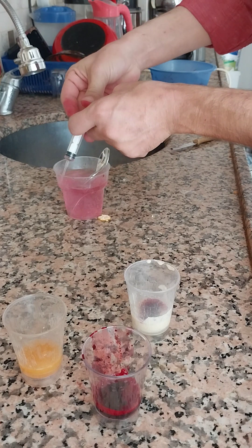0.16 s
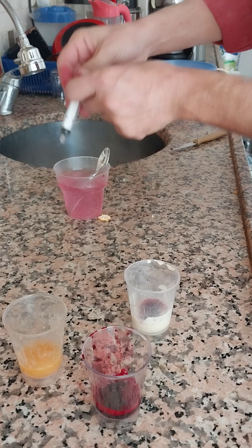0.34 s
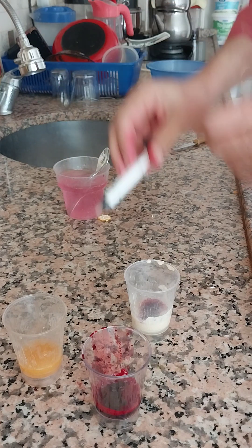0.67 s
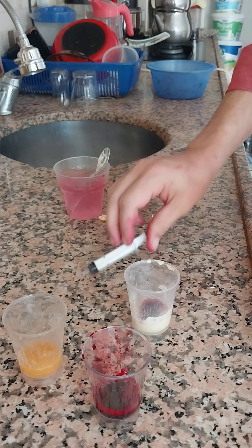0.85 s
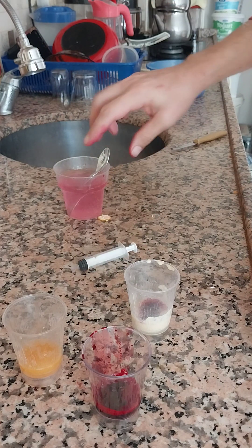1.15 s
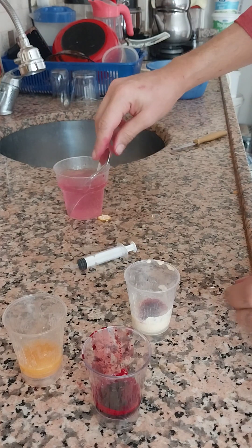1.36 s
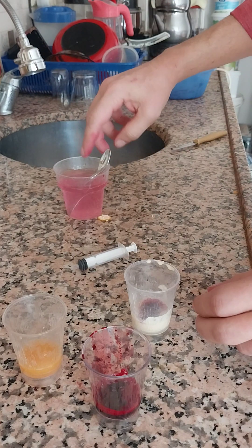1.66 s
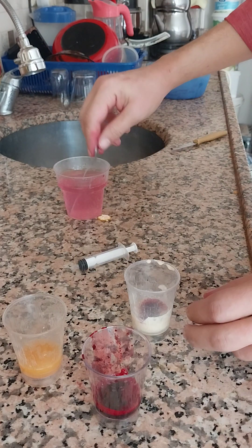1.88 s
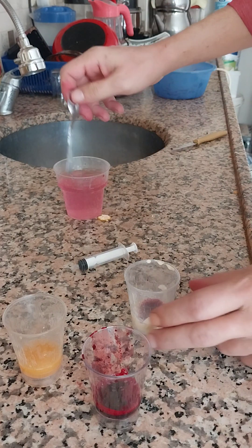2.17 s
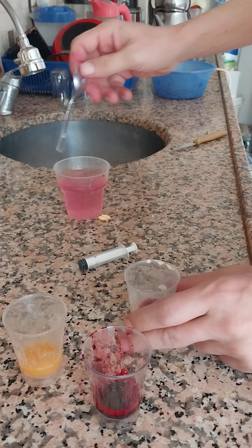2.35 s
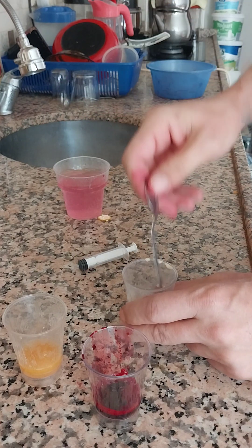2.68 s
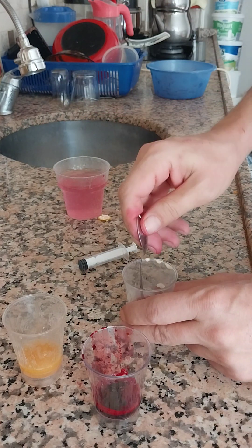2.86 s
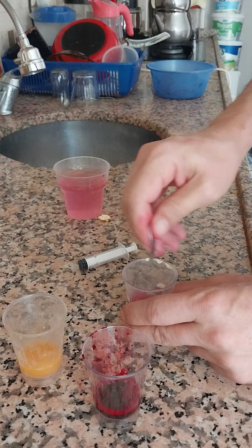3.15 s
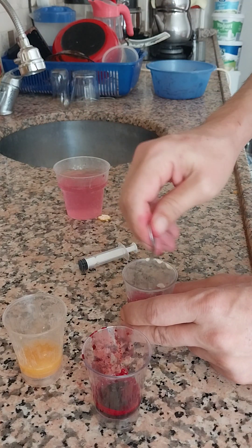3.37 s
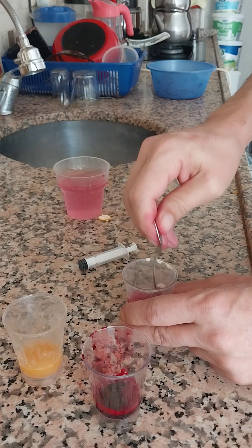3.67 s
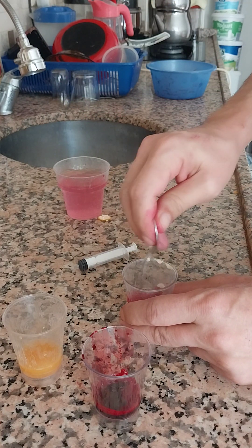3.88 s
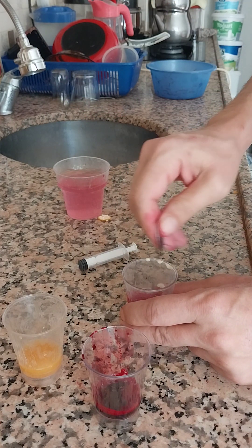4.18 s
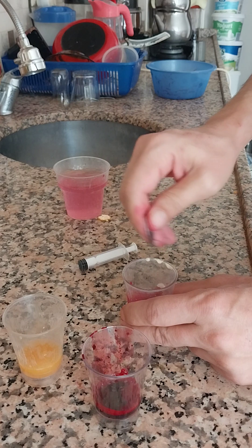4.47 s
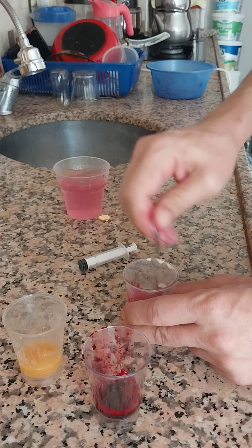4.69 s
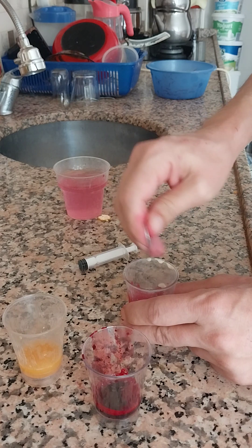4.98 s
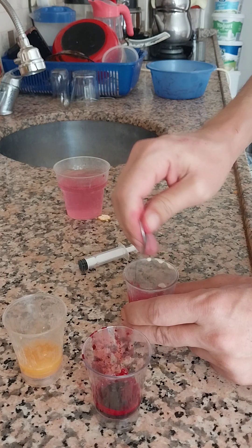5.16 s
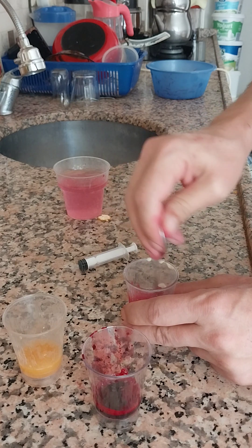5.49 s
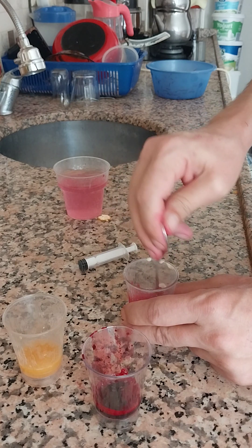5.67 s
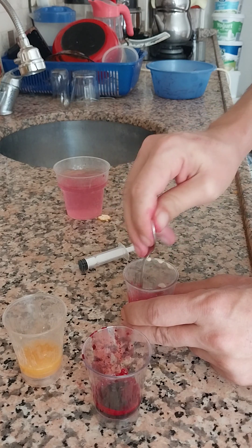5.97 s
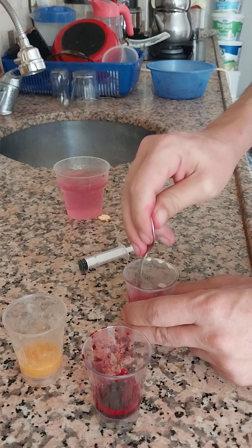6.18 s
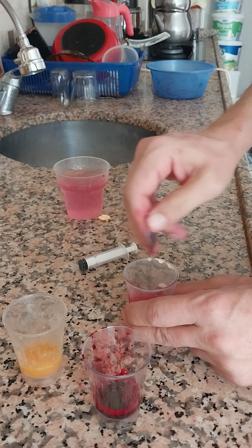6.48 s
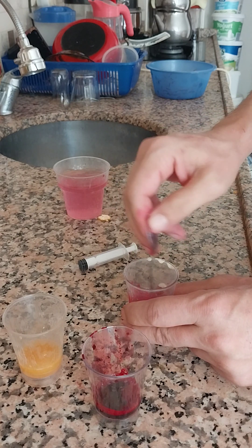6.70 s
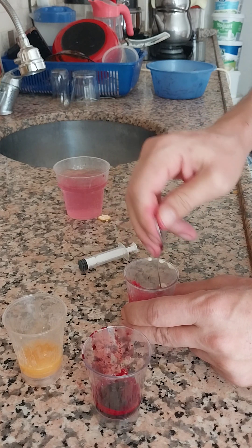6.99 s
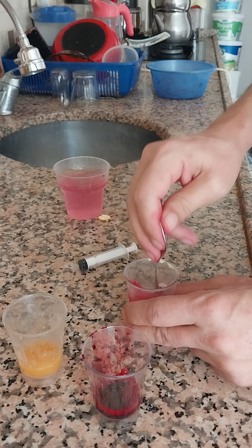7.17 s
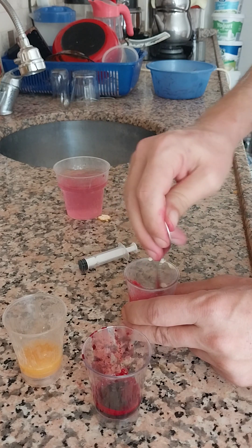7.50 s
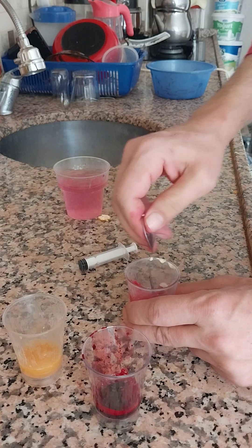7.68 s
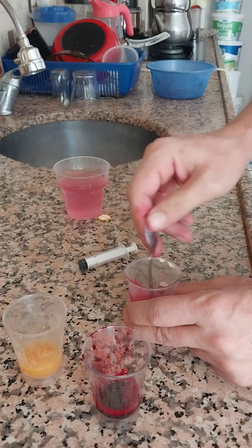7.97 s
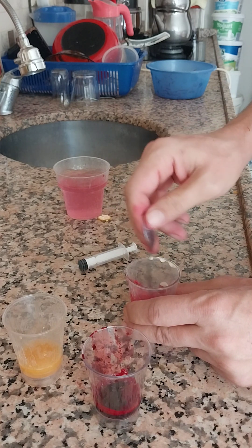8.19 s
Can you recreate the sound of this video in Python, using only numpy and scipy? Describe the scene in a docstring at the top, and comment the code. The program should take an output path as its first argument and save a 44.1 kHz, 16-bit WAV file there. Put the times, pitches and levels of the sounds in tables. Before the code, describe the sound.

A syringe squirts into a cup of water and clatters onto stone, then a metal teaspoon clicks and scrapes stirring paste in a thin plastic cup.

```python
"""A kitchen counter, heard by a phone with two microphone ports, a fridge humming over faint room noise.
A syringe squirts into a cup of water: spattering noise, rising bubble chirps and a squeak of narrow noise.
A sleeve rustles, the syringe drops on the stone (struck modes), and fingers tick on a spoon.
Then a steel teaspoon stirs thick paste in a thin plastic cup: stick-slip clicks drive its drifting modes,
blows ring cup, counter and spoon, and the edge skids along the wall as a chatter of rising rate."""
import sys
import numpy as np
from scipy import signal
from scipy.fft import rfft, irfft, next_fast_len
from scipy.io import wavfile
from scipy.ndimage import uniform_filter1d

SR = 44100
rng = np.random.default_rng(int(sys.argv[2]) if len(sys.argv) > 2 else 0)


def generate_wav(sig):
    """Save sig (samples, or channels by samples) to the path in sys.argv[1] as 16-bit PCM at SR."""
    pcm = np.round(np.clip(np.atleast_2d(sig).T, -1, 1) * 32767).astype(np.int16)
    wavfile.write(sys.argv[1], SR, pcm)


N = 367686

# Event levels are set ahead of the room and the ports. Tone tables weight a sound by frequency.

# Syringe jet. Each row: time in seconds, gain in dB.
JET = [(0.0, -42.5), (0.062, -54), (0.206, -54), (0.25, -50.5), (0.262, -40), (0.28, -73), (0.36, -73)]
# Tone of the jet in the water. Each row: frequency in Hz, level in dB per Hz.
JET_TONE = [(210, -37), (350, -25), (420, -23), (575, -39), (707, -24), (1260, -16.5), (1570, -12.5),
            (3340, -20.5), (6030, -17.5), (8710, -25.5), (11300, -18), (16000, -28.5)]
# Plunger squeaking in the barrel. Each row: time in seconds, pitch in Hz, fundamental in dB, octave in dB.
SQUEAK = [(.14, 735, -80, -70), (.16, 741, -70, -55), (.2, 799, -70, -56), (.215, 860, -58, -45),
          (.232, 779, -72, -46.5), (.25, 841, -62, -53), (.262, 770, -71, -38.5), (.275, 773, -76, -60),
          (.3, 767, -84, -73), (.33, 790, -92, -80)]
# Bubbles driven under by the jet grow as it digs deeper; one strand each for small, middling and large.
# Each row: time in seconds, pitch in Hz, level in dB.
GURGLE = [
    [(0, 2580, -43.5), (.04, 2540, -60), (.085, 2180, -51.5), (.14, 1960, -49), (.19, 1900, -62),
     (.22, 1816, -75)],
    [(0, 1500, -38), (.04, 1460, -62), (.09, 1440, -61), (.13, 1330, -55), (.16, 1400, -81)],
    [(0, 757, -45), (.03, 653, -62.5), (.07, 580, -61), (.11, 533, -64), (.14, 500, -76)],
]
# Sleeve as the arm swings, then reaches. Each row: time in seconds, gain in dB.
SLEEVE = [
    [(0.36, -78.5), (0.56, -65.5), (0.658, -76), (0.744, -79.5), (0.834, -105), (0.896, -102), (0.9, -100)],
    [(1.1, -86), (1.172, -90), (1.184, -91), (1.198, -87), (1.356, -84), (1.444, -80.5), (1.624, -95),
     (1.7, -100)],
]
# Tone of the cloth. Each row: frequency in Hz, level in dB per Hz.
SLEEVE_TONE = [(590, -42), (1000, -16), (1440, -9), (1530, -1), (2530, -18), (2810, -13), (3490, -14.5),
               (4600, -10.5), (5100, -12), (5780, -10), (6410, -21.5), (7700, -16.5), (8540, -31),
               (10000, -15), (15500, -25.5)]
# Syringe landing and bouncing on the stone.
# Each row: start in seconds, then peak levels of barrel, crack and thump in dB.
DROP = [(0.918, -28.5, -38.5, -90), (0.93, -34, -53, -33), (0.9542, -28.5, -18, -53.5),
        (0.989, -37.5, -34, -42.5)]
# Modes of the syringe barrel. Each row: frequency in Hz, level in dB, t60 in seconds.
BARREL = [(440, -4, .05), (560, -3, .04), (700, -5, .04), (860, -7, .04), (1050, -8, .03), (1300, -6, .03),
          (1560, 0, .035), (1680, -5, .03), (2200, -14, .02)]
# Fingers touching the spoon that stands in the water. Each row: start in seconds, peak in dB, pitch in Hz.
TICKS = [(1.128, -59.5, 3850), (1.1825, -46.5, 8500), (1.212, -62, 5000), (1.28, -56.5, 5800),
         (1.383, -58.5, 9700), (1.448, -51, 3540), (1.562, -55.5, 1020), (1.592, -72, 6200),
         (1.628, -70, 6300), (1.8532, -69.5, 4700)]

# Strokes of the spoon through the paste.
# Each row: moment of most pressure in seconds, then wall ring, base ring and grit in dB.
STROKES = [(2.92, -55, -61, -73), (3.132, -58, -58, -69.5), (3.2, -55.5, -68, -70), (3.302, -62, -63, -72),
           (3.4, -59.5, -71, -69), (3.47, -54, -56, -67), (3.62, -65, -69, -69.5), (3.718, -77, -55, -85),
           (3.822, -56, -59.5, -68.5), (3.91, -79, -60, -78), (4.032, -59.5, -60, -73),
           (4.094, -58, -54.5, -67), (4.276, -49.5, -57, -65), (4.46, -56, -61.5, -65.5),
           (4.52, -54.5, -64, -71.5), (4.705, -53.5, -57, -64), (4.901, -48, -64, -69.5),
           (5.037, -54, -58, -65.5), (5.114, -50.5, -56, -68.5), (5.28, -58, -58.5, -68.5),
           (5.414, -53.5, -65, -67), (5.52, -56.5, -63, -75), (5.623, -56.5, -66, -71.5),
           (5.72, -56, -85, -70.5), (5.826, -64, -62.5, -70), (5.931, -56.5, -59, -67.5),
           (6.034, -58, -60, -73), (6.131, -52, -55.5, -68.5), (6.352, -54, -62.5, -66.5),
           (6.448, -61.5, -65, -75.5), (6.55, -80, -65, -91), (6.605, -52.5, -59, -59.5),
           (6.79, -50.5, -57.5, -62.5), (6.96, -53, -56.5, -70), (7.019, -56.5, -57, -62.5),
           (7.244, -49, -51.5, -68), (7.445, -51.5, -59.5, -67), (7.62, -62, -84, -70.5),
           (7.731, -53.5, -60, -77), (7.84, -71, -65, -74.5), (8.059, -60, -60.5, -69.5),
           (8.286, -58, -63, -64)]
# Paste smacking round the spoon. Each row: middle in seconds, level in dB, pitch in Hz.
SMACKS = [(3.44, -62, 2660), (3.52, -61, 2840), (4.11, -73, 2590), (4.9, -70.5, 2650), (5.06, -67, 2750),
          (6.13, -74, 2540), (6.18, -61.5, 2790), (6.23, -67, 2900), (6.65, -64.5, 2780),
          (7.05, -65.5, 2570)]
# Short bright rasps as the edge brushes the wall. Each row: middle in seconds, level in dB.
RASPS = [(3.135, -66), (3.455, -70), (5.045, -59), (5.108, -47.5), (5.235, -61), (5.295, -64),
         (5.415, -50.5), (5.51, -59), (5.62, -61), (6.035, -60), (7.004, -66), (8.05, -60)]
# Tone of the rasps. Each row: frequency in Hz, level in dB per Hz.
RASP_TONE = [(2000, -4), (4000, -5), (5300, 2.5), (6300, -7), (7500, 1.5), (8600, -9), (11500, -4.5),
             (16000, -23)]
# Grit of steel on plastic. Each row: frequency in Hz, level in dB per Hz.
GRIT = [(2120, -36.5), (3600, -2.5), (3970, 0), (4730, -5.5), (5110, -8), (6060, -9), (7440, -7.5),
        (8500, -14.5), (11500, -13), (15300, -23.5)]

# Spoon knocks on the cup wall.
# Each row: start in seconds, peak in dB, strongest ring in Hz, peak of the thump into the counter in dB.
KNOCKS = [(2.886, -26, 1376, -36.5), (2.9791, -36.5, 1530, -76), (3.307, -48.5, 1620, -51),
          (3.372, -48.5, 1530, -76), (3.4534, -32.5, 1730, -44.5), (3.5771, -39, 1570, -70),
          (3.6319, -38, 1550, -45.5), (3.697, -33, 1630, -33.5), (3.7848, -36.5, 1530, -54),
          (3.8567, -41, 1530, -51), (3.901, -35, 1420, -44), (4.0076, -35, 1570, -65),
          (4.212, -42.5, 1680, -68), (4.2423, -27, 1670, -49), (4.425, -29, 1560, -42.5),
          (4.458, -34, 1680, -53), (4.625, -40, 1650, -72), (4.6786, -36, 1550, -65),
          (5.102, -31, 1600, -42.5), (5.23, -39.5, 1600, -59), (5.2833, -34, 1500, -55),
          (5.509, -32, 1720, -54), (5.692, -55, 1670, -54), (5.91, -36.5, 1730, -44),
          (6.107, -42, 1650, -49), (6.1478, -36, 2050, -63), (6.264, -40, 1700, -51),
          (6.316, -38, 1660, -48), (6.52, -27, 1730, -40.5), (6.557, -35.5, 1600, -65),
          (6.662, -45.5, 1670, -71), (6.773, -32.5, 1510, -64), (6.9078, -34, 1540, -54),
          (6.9629, -40, 1530, -51), (7.001, -26.5, 1560, -38.5), (7.156, -36, 1570, -46),
          (7.3589, -35, 1870, -51), (7.5911, -35.5, 1740, -44.5), (7.9383, -44.5, 1700, -47),
          (8.043, -26.5, 1860, -33.5), (8.077, -38, 1750, -46), (8.219, -47.5, 1670, -48.5),
          (8.26, -36.5, 1560, -48), (8.279, -35.5, 1550, -45)]
# Softer bumps on the cup base, under the paste. Each row: start in seconds, peak in dB, strongest ring in Hz.
BUMPS = [(2.893, -36, 680), (2.984, -41, 744), (3.278, -41.5, 810), (3.466, -31.5, 707), (3.648, -36, 680),
         (3.703, -32, 680), (3.86, -36.5, 710), (3.903, -36, 695), (4.271, -43, 750), (4.432, -43, 760),
         (4.501, -37, 744), (4.949, -45, 690), (5.115, -34.5, 720), (5.298, -43.5, 700),
         (5.399, -46.5, 635), (5.519, -56, 744), (5.602, -45.5, 760), (5.618, -48.5, 706),
         (5.712, -47, 730), (5.731, -57, 706), (5.75, -50, 816), (5.77, -47, 704), (5.914, -38.5, 684),
         (5.934, -45, 700), (5.952, -41, 725), (5.972, -57, 695), (6.118, -41, 760), (6.352, -46, 715),
         (6.597, -40.5, 750), (6.785, -40, 746), (7.006, -31, 676), (7.03, -40.5, 600), (7.055, -45.5, 560),
         (7.221, -47.5, 704), (7.272, -38, 750), (7.362, -53, 654), (7.437, -43.5, 751), (7.495, -51, 720),
         (7.758, -49.5, 760), (7.828, -54, 680), (8.047, -31, 680), (8.072, -39, 676), (8.281, -52, 740),
         (8.298, -40, 738), (8.322, -52, 730)]
# Sharp clicks of the steel edge on the rim. Each row: start in seconds, peak of the spoon ring in dB.
CLICKS = [(2.8838, -54), (3.5777, -51), (3.698, -45), (3.7864, -30), (3.905, -39), (4.008, -56),
          (4.213, -56), (4.2344, -43), (4.419, -29.5), (4.6242, -25), (4.847, -42), (4.864, -40),
          (5.104, -39), (5.2244, -44), (5.5056, -43.5), (5.916, -51.5), (6.262, -37.5), (6.308, -45),
          (6.521, -27), (6.662, -43), (6.74, -32.5), (6.9103, -28.5), (6.964, -34), (6.999, -39),
          (7.1548, -29.5), (7.3606, -34), (7.595, -32.5), (7.844, -52.5), (7.873, -64), (7.9397, -45),
          (8.0136, -47), (8.037, -48), (8.26, -49)]
# Modes of the cup base, ahead of the paste's damping, and of the wall; both as struck.
# Each row: frequency in Hz, level in dB, t60 in seconds.
CUP_BASE = [(524, -15, 0.041), (669, -28.5, .045), (689.6, 1, 0.081), (738.4, 4, 0.085), (846, -19.5, 0.08),
            (920, -17, 0.023)]
CUP_WALL = [(1318, -12, 0.19), (1420, -20, 0.051), (1539, -1, 0.064), (1694, -1.5, 0.076), (1710, 3, 0.048),
            (1820, -11, 0.031), (1948, -13, 0.12), (2094, -6.5, 0.054)]
# Modes of the stone counter. Each row: frequency in Hz, level in dB, t60 in seconds.
COUNTER = [(170, -2, .07), (205, -3, .07), (265, -1, .07), (300, 0, .07), (380, -13, .05), (500, -11, .05)]
# Modes of the spoon, damped by fingers and paste. Each row: frequency in Hz, level in dB, t60 as struck in seconds.
SPOON = [(2850, -4, .008), (3950, 0, .006), (4450, 0, .006), (5250, 0, .006), (5750, -2, .005),
         (6350, -5, .005), (7400, -6, .005)]
# Tone of the edge rattling on along the rim. Each row: frequency in Hz, level in dB per Hz.
RATTLE_TONE = [(1800, -25), (2800, 6), (4200, -1), (5600, -9), (7400, -8), (11500, -10), (16000, -8)]
# The edge skidding along the wall. Each row: start in seconds, peak in dB, starting rate in Hz, length in seconds.
SKIDS = [(3.115, -35.5, 1340, 0.04), (3.153, -35.5, 1696, 0.022), (3.432, -41, 1457, 0.039),
         (4.235, -42, 1447, 0.049), (4.888, -39, 1448, 0.032), (5.005, -38.5, 1405, 0.048),
         (5.081, -34, 1463, 0.045), (5.394, -35.5, 1350, 0.036), (5.496, -37, 1430, 0.024),
         (5.598, -34, 1290, 0.058), (5.801, -35, 1268, 0.056), (6.019, -29.5, 1301, 0.0386),
         (6.73, -38, 1434, 0.048), (7.216, -34.5, 1452, 0.036), (7.415, -35.5, 1423, 0.034),
         (7.688, -39, 1470, 0.081), (8.005, -43, 1450, 0.027)]
# Hiss of skids and of sliding paste. Each row: frequency in Hz, level in dB per Hz.
SKID_FIZZ = [(2500, -20), (4000, -10), (5300, 9), (6300, -1), (7500, 10.5), (8300, -4), (11300, 0.5),
             (13000, -6), (16000, -28)]

# Fridge hum. Each row: frequency in Hz, middle level in dB rms.
HUM = [(100, -53.5), (200, -70.5), (300, -79)]
# Tone of the room noise. Each row: frequency in Hz, level in dB per Hz.
ROOM_NOISE = [(15, -65), (25, -13), (43, -11.5), (74, -14.5), (102, -10.5), (145, -11), (293, -17),
              (380, -25.5), (439, -28), (545, -29), (936, -41), (1700, -37), (2050, -45), (5430, -51),
              (14400, -49.5), (16000, -67)]
# Likeness of the room noise at the two ports. Each row: frequency in Hz, share from 0 to 1.
ALIKE = [(30, 0), (60, 1), (130, 0.92), (290, 0.46), (640, 0.24), (1410, 0.059), (15000, 0)]
# Decay of the room. Each row: frequency in Hz, t60 in seconds.
ROOM_T60 = [(200, 0.25), (1500, 0.22), (5000, 0.23), (14000, 0.17)]
# Phase turn round the case to the right port. Each row: frequency in Hz, turn in radians.
PORT_TURN = [(300, 1), (650, 0.5), (1000, 0.5), (2500, 1.83), (5000, 0.76), (8000, 2.5), (11000, -0.5),
             (15000, -3.5)]
# Colour of the two ports. Each row: frequency in Hz, left minus right in dB.
PORTS = [(100, -2), (170, -3), (230, -10.5), (290, -13.5), (400, -1.5), (530, 1.5), (700, -8), (1100, 1.5),
         (1600, -9), (2050, -8), (2900, 4.5), (4400, 6), (8000, 0), (15000, -1)]

PRESS_S, EASE_S = 0.039, 0.036  # time constants of a stroke building and letting go
SMACK_S, RASP_S = 0.042, 0.0053  # time constants of smacks and rasps, both ways
SMACK_UNDER_GRIT_DB = -8.5  # smacking that follows the grit of every stroke
WASH_DB, WASH_FOLLOW_S = -6, 0.17  # paste sliding on the wall, against the mean grit over this span
POCKET_DB = 0.5  # air pockets popping, against the ring
EDGE_RING_DB = -7.5  # the spoon's own ring, against the grit
DRIFT, DRIFT_PER_S = 0.044, 9.0  # squeezed cup and loaded spoon shift modes by this share, this often
PASTE_DAMP_S = 0.028  # the paste chokes the ring of the base, time constant
CRACK_DB = -1  # gritty crack against the spoon ring
RATTLE_DB, RATTLE_T60_S = -19.5, 0.15  # rattle against the spoon ring, decay ahead of its closing fade
# top of a faint click in dB, its dB gained per dB of blow, and the level of that faint click
SIZZLE_DB, SIZZLE_GROWTH, FAINT_CLICK_DB = -51, 0.39, -44
SKID_END_HZ, SKID_FIZZ_DB = 1743, -20  # chatter rate at the end; fizz against the chatter
ROOM_NOISE_DB = -62.5  # rms over both ports
ROOM_DB, PORT_LAG_S = -4.5, 0.00012  # room tail against direct sound; extra travel to the right port
TOP_HZ = 15900


def undb(db):
    """Gain of a level in dB."""
    return 10 ** (np.asarray(db) / 20)


def level(x, db):
    """Scale to an rms level in dB."""
    return x * undb(db) / np.sqrt(np.mean(x ** 2))


def over_hz(table, size):
    """A (Hz, value) table read at the bins of a transform, on a log frequency axis."""
    hz, value = np.transpose(table)
    bins = np.fft.rfftfreq(size, 1 / SR)
    return np.interp(np.log(bins + 1), np.log(np.maximum(hz, 1)), value)


def colour(x, table):
    """Causal filter with the gains of a (Hz, dB) table, folded from the cepstrum."""
    ceps = irfft(over_hz(table, size=4096) * np.log(10) / 20)
    ceps[1:2048] *= 2
    ceps[2049:] = 0
    response = irfft(np.exp(rfft(ceps)))[:2048]
    return signal.oaconvolve(x, response)[:len(x)]


def over_time(table):
    """Columns of a curve at every sample, and a gate that is open within its span."""
    s, *columns = np.transpose(table)
    t = np.arange(N) / SR
    gate = uniform_filter1d(1. * ((t >= s[0]) & (t <= s[-1])), size=441)
    return [np.interp(t, s, column) for column in columns], gate


def walk(rate):
    """Random levels held 1 / rate seconds and slewed twice; spread near 1."""
    hold = int(SR / rate)
    steps = np.repeat(rng.standard_normal(N // hold + 1), hold)
    return 1.3 * uniform_filter1d(uniform_filter1d(steps, hold), hold)[:N]


def grains(rate, spread_db):
    """Random clicks, rate of them a second, most small and a few large."""
    return (rng.random(N) < rate / SR) * rng.standard_normal(N) * undb(spread_db * rng.exponential(size=N))


def wander(hz, width_hz):
    """Narrow noise around a moving pitch, rms 1."""
    phase = 2 * np.pi * np.cumsum(hz) / SR
    return level(walk(width_hz) * np.cos(phase) + walk(width_hz) * np.sin(phase), 0)


def evened(x, db):
    """Hold a level over a twentieth of a second, as a steady hand does; the grain inside stays."""
    power = uniform_filter1d(x ** 2, size=2200)
    return undb(db) * x / np.sqrt(power + 1e-3 * np.mean(x ** 2))


def bubbles(hz, spread, cycles, glide, count, span):
    """Short damped tones that chirp upward, scattered in time and round a pitch."""
    when, pitch, size = rng.random(count), rng.standard_normal(count), rng.exponential(size=count)
    start = ((span[0] + when * (span[1] - span[0])) * SR).astype(int).clip(0, N - 1)
    f = (hz[start] * np.exp(spread * pitch))[:, None]
    turns = f * np.arange(1024) / SR
    shape = np.minimum(turns, 1) * np.exp(-turns / cycles) * undb(4.5 * size)[:, None]
    chirp = 1 + glide * np.minimum(turns / cycles, 3) / 2
    tone = shape * np.sin(2 * np.pi * turns * chirp)
    at = start[:, None] + np.arange(1024)
    return np.bincount(at.ravel(), tone.ravel(), N + 1024)[:N]


def ring(modes, scatter_db, near_hz=None, width=0.043):
    """Impulse response of a set of modes; each blow lands elsewhere and favours those near one pitch."""
    hz, db, t60 = np.transpose(modes)[:, :, None]
    chance = rng.standard_normal((2, len(modes), 1))
    if near_hz:
        db = db + 9.0 * np.exp(-(np.log(hz / near_hz) / width) ** 2)
    t = np.arange(SR // 8) / SR
    decay = np.exp(-np.log(1000) * t / t60)
    tone = np.sin(2 * np.pi * hz * (1 + 0.015 * chance[0]) * t) * decay
    return np.sum(undb(db + scatter_db * chance[1]) * tone, axis=0)


def choke(response, time_s):
    """Damp an impulse response further, exponentially."""
    return response * np.exp(-np.arange(len(response)) / SR / time_s)


def burst(t60, spiky_db, rise_s=0.000067):
    """A contact: a chatter of uneven clicks that builds and dies away."""
    t = np.arange(SR // 10) / SR
    chance = rng.standard_normal((2, len(t)))
    shape = (1 - np.exp(-t / rise_s)) * np.exp(-np.log(1000) * t / t60)
    return chance[0] * undb(spiky_db * chance[1]) * shape


def add(out, s, sound, db):
    """Mix a sound in at a time, its peak at a level."""
    i = int(s * SR)
    part = sound[:N - i]
    out[i:i + len(part)] += part * undb(db) / np.max(np.abs(sound))


def syringe():
    """The jet spatters into the water over the squeak; the barrel clatters on the stone."""
    (jet_db,), gate = over_time(JET)
    spatter = level(colour(grains(6900, 0.75) * undb(2.1 * walk(50.3)), JET_TONE), -0.1)
    out = gate * undb(jet_db) * spatter
    (hz, *squeak_db), pressed = over_time(SQUEAK)
    for k, db in enumerate(squeak_db, start=1):
        out += pressed * undb(db + 2.05 * walk(49.6)) * wander(k * hz, 50 * k ** 1.6)
    for strand in GURGLE:
        (hz, gurgle_db), under = over_time(strand)
        chirps = bubbles(hz, 0.071, cycles=6.6, glide=0.02, count=110, span=(0, .25))
        out += under * undb(gurgle_db) * evened(chirps, 0)
    crack_tone = [(2000, -11.0), (4500, -5.5), (8500, -13.0), (12000, -4.5), (16000, -18.5)]
    for s, barrel_db, crack_db, thump_db in DROP:
        push = burst(0.032, spiky_db=5.0)
        push[0] = 4.8  # hard plastic on stone starts with a clean tick
        add(out, s, signal.fftconvolve(push, ring(BARREL, 3.3)), barrel_db)
        add(out, s, signal.fftconvolve(push, ring(COUNTER, 9.1)), thump_db)
        add(out, s, colour(burst(0.036, spiky_db=5.5), crack_tone), crack_db)
    return out


def background():
    """Room noise, alike at both ports in the bass only, and the wavering hum of the fridge."""
    size = next_fast_len(N)
    one, other = (rfft(rng.standard_normal(size)) * undb(over_hz(ROOM_NOISE, size)) for _ in range(2))
    alike = np.clip(over_hz(ALIKE, size), 0, 1)
    noise = irfft([one, alike * one + np.sqrt(1 - alike ** 2) * other], size)[:, :N]
    t = np.arange(N) / SR
    drift = 0.28 * walk(2.86)  # radians at 100 Hz
    hum = np.zeros(N)
    for hz, db in HUM:
        swell = np.sqrt(2) * undb(db + 1.43 * walk(16))
        hum += swell * np.sin(2 * np.pi * hz * t + drift * hz / 100)
    return level(noise, ROOM_NOISE_DB) + hum


def hands():
    """Cloth rustles as coloured random clicks; each finger tick is a short burst round its pitch."""
    out = np.zeros(N)
    cloth = level(colour(grains(9000, 0.94), SLEEVE_TONE), 3.7)
    for swing in SLEEVE:
        (db,), gate = over_time(swing)
        out += gate * undb(db) * cloth
    for s, db, hz in TICKS:
        tone = [(hz / 3, -18), (hz / 1.5, -9), (hz, 0), (hz * 1.7, -8), (hz * 2.9, -16)]
        add(out, s, colour(burst(0.021, spiky_db=0.0), tone), db)
    return out


def swells(times, dbs, rise_s, fall_s):
    """Gain at every sample from overlapping swells, each rounded at its top."""
    t = np.arange(0, N + 64, 64) / SR
    late = t - np.asarray(times)[:, None]
    rise = np.exp(-(late / rise_s) ** 2)
    fall = 1 / np.cosh(np.clip(late / fall_s, 0, 30))
    shape = np.where(late < 0, rise, fall)
    power = np.sum((undb(dbs)[:, None] * shape) ** 2, axis=0)
    return np.interp(np.arange(N) / SR, t, np.sqrt(power))


def sway(x, modes, patchy_db, longer):
    """Modes whose pitch drifts while a rubbing drives them, each in its own spurts; longer scales t60."""
    out = 0
    for hz, db, t60 in modes:
        turn = np.exp(2j * np.pi * np.cumsum(hz * (1 + DRIFT * walk(DRIFT_PER_S))) / SR)
        keep = np.exp(-np.log(1000) / (longer * t60 * SR))
        # turned down to 0 Hz, a one-pole decay is the mode; then turned back up
        held = signal.lfilter([1], [1, -keep], x * undb(patchy_db * walk(30)) / turn)
        out = out + undb(db) * np.imag(held * turn)
    return out


def with_pockets(rubbed, hz, spread):
    """A rubbed ring joined by air pockets that pop as short chirps."""
    pops = bubbles(np.full(N, hz), spread, cycles=6.2, glide=0.058, count=900, span=(2.8, 8.34))
    return evened(rubbed, 0) + evened(pops, POCKET_DB)


def drag():
    """Stick-slip in uneven spurts; as the edge circles, the driven modes keep changing and pockets pop."""
    slips = grains(900, 3.3) * undb(2.3 * walk(60))
    wall = with_pockets(sway(slips, CUP_WALL, patchy_db=13.5, longer=0.86), hz=1610, spread=0.115)
    base = with_pockets(sway(slips, CUP_BASE, patchy_db=10.5, longer=0.65), hz=718, spread=0.054)
    smack_tone = [(1500, -31.0), (2400, -6), (2900, 2.0), (3500, -32.0), (5000, -22.5)]
    smack = colour(grains(1500, 4.6), smack_tone) * undb(3.7 * walk(55))
    grit = colour(grains(4000, 0.6) * undb(4.5 * walk(70)), GRIT)
    edge = sway(grains(3000, 1.0), SPOON + [(11140, -1, .004)], patchy_db=21.5, longer=4.6)
    grit = evened(grit, 0) + evened(edge, EDGE_RING_DB)
    wash = colour(grains(9000, 0.5) * undb(2.0 * walk(25)), SKID_FIZZ)
    rasp = colour(grains(8200, 1.1), RASP_TONE)
    smack_s, smack_db, smack_hz = np.transpose(SMACKS)
    pop_hz = np.interp(np.arange(N) / SR, smack_s, smack_hz)
    pops = bubbles(pop_hz, 0.1, cycles=9.3, glide=0.019, count=3500, span=(2.8, 8.34))

    s, wall_db, base_db, grit_db = np.transpose(STROKES)
    on_wall, on_base, rubbing = (swells(s, db, PRESS_S, EASE_S) for db in (wall_db, base_db, grit_db))
    wet = undb(SMACK_UNDER_GRIT_DB) * rubbing
    popping = swells(smack_s, smack_db, SMACK_S, SMACK_S)
    sliding = undb(WASH_DB) * uniform_filter1d(rubbing, int(WASH_FOLLOW_S * SR))
    brushing = swells(*np.transpose(RASPS), RASP_S, RASP_S)
    layers = [(wall, on_wall), (base, on_base), (smack, wet), (pops, popping),
              (wash, sliding), (rasp, brushing), (grit, rubbing)]
    return sum(gain * evened(x, 0) for x, gain in layers)


def knocks():
    """Blows on wall and base ring the cup and counter; clicks ring the spoon under a crack."""
    out = np.zeros(N)
    for s, db, hz, thump_db in KNOCKS:
        push = burst(0.033, spiky_db=3.5, rise_s=0.00018)
        add(out, s, signal.fftconvolve(push, ring(CUP_WALL, 2.8, hz)), db)
        add(out, s, signal.fftconvolve(push, ring(COUNTER, 3.0)), thump_db)
    for s, db, hz in BUMPS:
        push = burst(0.034, spiky_db=4.0, rise_s=0.0019)
        choked = choke(ring(CUP_BASE, 1.2, hz, width=0.06), PASTE_DAMP_S)
        add(out, s, signal.fftconvolve(push, choked), db)
    fade = np.hanning(SR // 5)[SR // 10:]
    sizzle_tone = [(6000, -26), (9000, -1), (12000, 12.5), (16000, 10.5)]
    for s, db in CLICKS:
        push = burst(0.03, spiky_db=-1.5)
        push[0] = 5.1  # the first touch of hard steel is one clean tick
        add(out, s, signal.fftconvolve(push, ring(SPOON, 2.0)), db)
        add(out, s, colour(push, GRIT), db + CRACK_DB)
        rattle = burst(RATTLE_T60_S, spiky_db=6.5, rise_s=0.0011) * fade
        add(out, s, colour(rattle, RATTLE_TONE), db + RATTLE_DB)
        sizzle_db = SIZZLE_DB + SIZZLE_GROWTH * (db - FAINT_CLICK_DB)
        add(out, s, colour(push, sizzle_tone), sizzle_db)
    return out


def skids():
    """A rough chatter of rising rate swells and fades, heard through the wall modes, with a fizz on top."""
    out = np.zeros(N)
    for s, db, start_hz, length in SKIDS:
        part = np.arange(int(length * SR)) / (length * SR)
        phase = 2 * np.pi * np.cumsum(start_hz + (SKID_END_HZ - start_hz) * part) / SR
        wobble = uniform_filter1d(rng.standard_normal((2, SR // 10)), size=170)[:, :len(part)]
        chatter = wobble[0] * np.cos(phase) + wobble[1] * np.sin(phase)
        chatter *= np.sin(np.pi * part ** 0.68) ** 1.15
        chatter *= undb(3.4 * rng.standard_normal(SR // 10)[:len(part)])  # uneven slips spread it
        add(out, s, signal.fftconvolve(chatter, choke(ring(CUP_WALL, 0.99), 0.01)), db)
        fizz = np.sin(np.pi * part) ** 2 * rng.standard_normal(SR // 10)[:len(part)]
        add(out, s, colour(fizz, SKID_FIZZ), db + SKID_FIZZ_DB)
    return out


def kitchen(x):
    """Direct sound reaches the left port first; the walls return a different dense tail to each port."""
    size = next_fast_len(N + SR)
    lag = 2 * np.pi * np.fft.rfftfreq(size, 1 / SR) * PORT_LAG_S
    late = np.exp(-1j * (lag + over_hz(PORT_TURN, size)))
    heard = np.array([x, irfft(rfft(x, size) * late, size)[:N]])
    for port in heard:
        _, frames, z = signal.stft(rng.standard_normal(SR // 2), SR, nperseg=128)
        decay = undb(-60 * frames / over_hz(ROOM_T60, size=128)[:, None])
        tail = signal.istft(z * decay, SR)[1]
        # silent for the first 2 ms, then in over about 1 ms
        tail *= np.clip((np.arange(len(tail)) / SR - .002) / 0.00097, 0, 1)
        port += undb(ROOM_DB) * signal.fftconvolve(x, tail / np.linalg.norm(tail))[:N]
    return heard


def scene():
    """Everything at the two ports; such small things give off no deep bass."""
    near = syringe() + hands() + drag() + knocks() + skids()
    no_bass = signal.butter(2, 130, "high", fs=SR, output="sos")
    return kitchen(signal.sosfilt(no_bass, near)) + background()


def record(dry):
    """Each port has its own colour; the recorder cuts the deep bass and the top."""
    ports = [colour(x, [(hz, side * db / 2) for hz, db in PORTS]) for x, side in zip(dry, (1, -1))]
    ports = signal.sosfilt(signal.butter(3, 45, "high", fs=SR, output="sos"), ports)
    return signal.sosfilt(signal.ellip(10, .2, 70, TOP_HZ, fs=SR, output="sos"), ports)


dry = scene()
out = record(dry)
generate_wav(out)
```